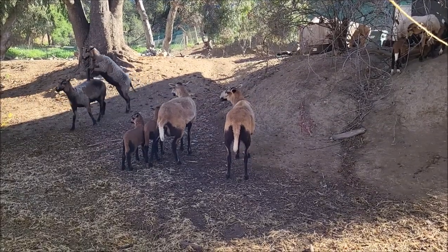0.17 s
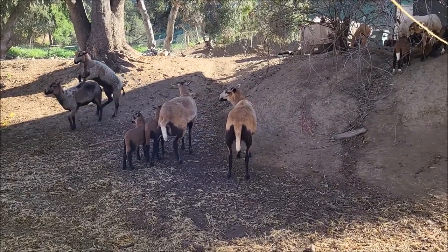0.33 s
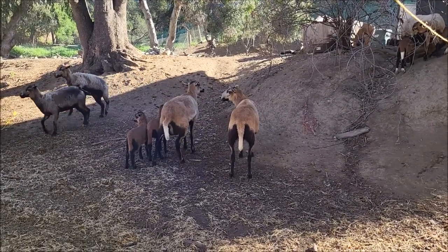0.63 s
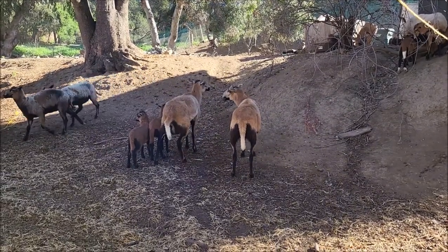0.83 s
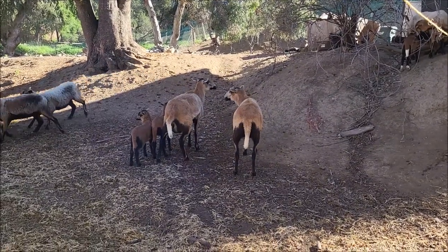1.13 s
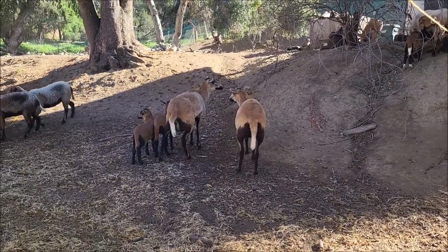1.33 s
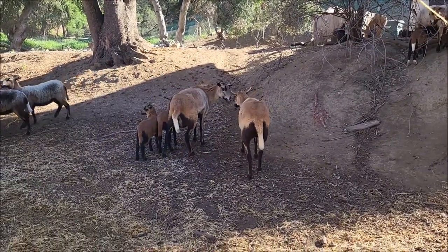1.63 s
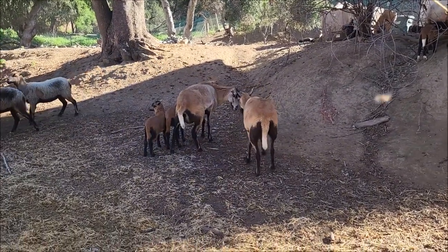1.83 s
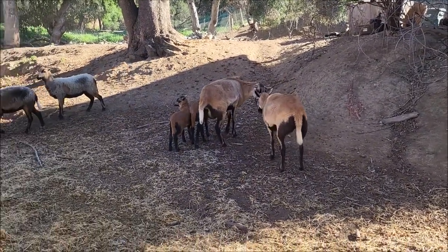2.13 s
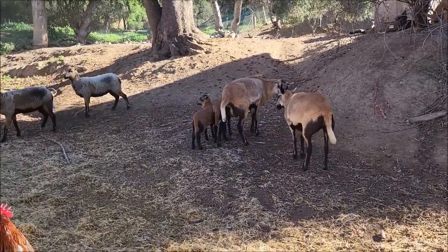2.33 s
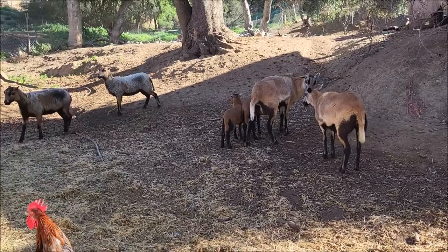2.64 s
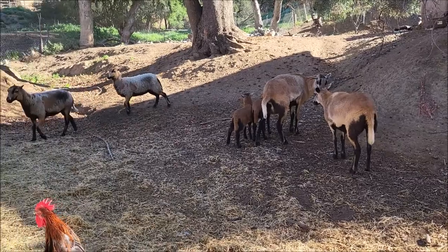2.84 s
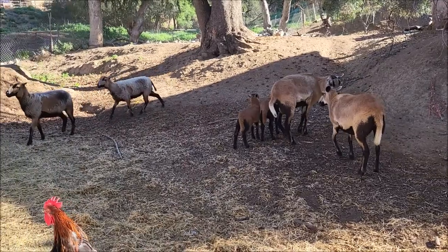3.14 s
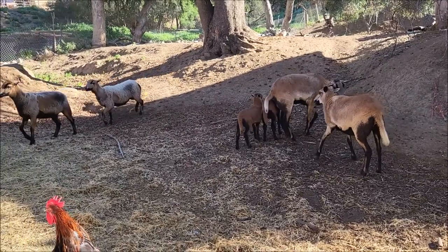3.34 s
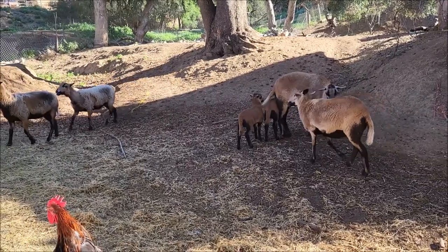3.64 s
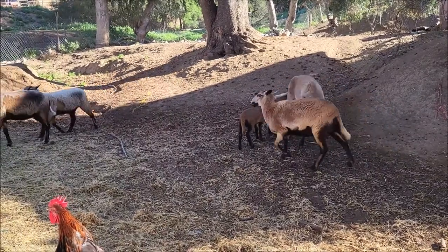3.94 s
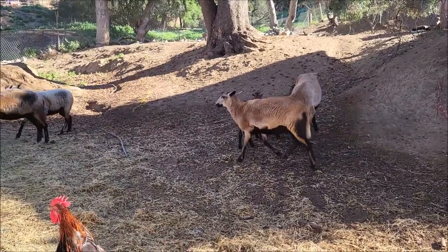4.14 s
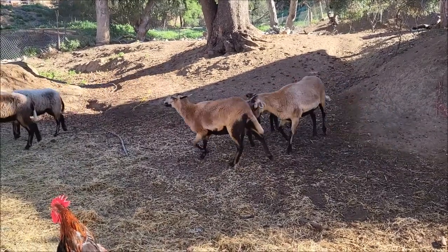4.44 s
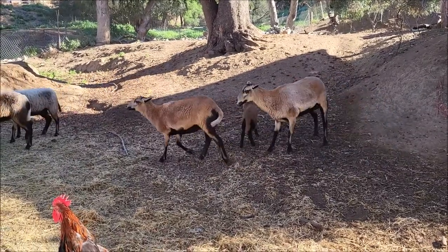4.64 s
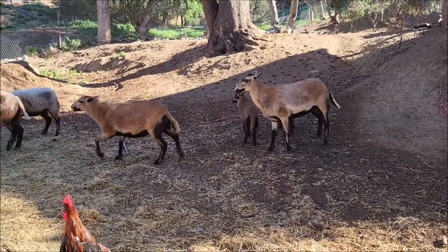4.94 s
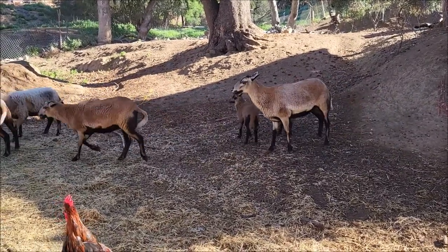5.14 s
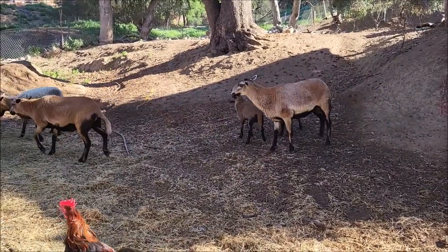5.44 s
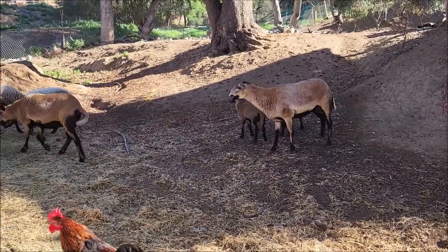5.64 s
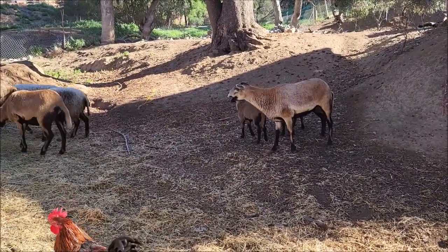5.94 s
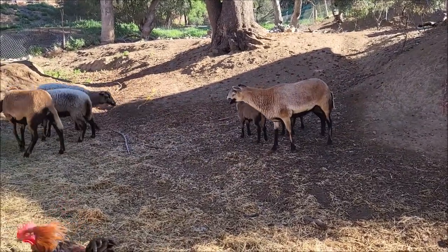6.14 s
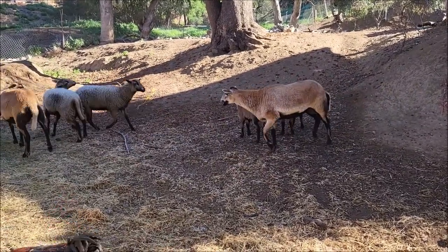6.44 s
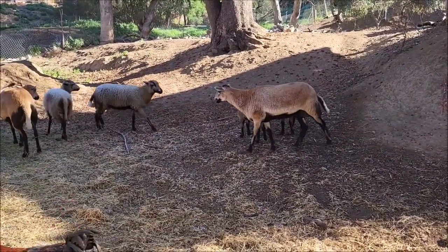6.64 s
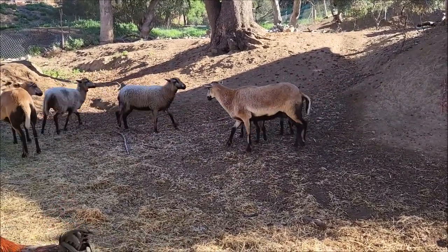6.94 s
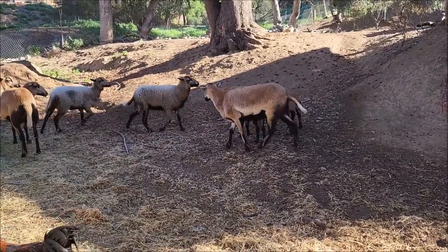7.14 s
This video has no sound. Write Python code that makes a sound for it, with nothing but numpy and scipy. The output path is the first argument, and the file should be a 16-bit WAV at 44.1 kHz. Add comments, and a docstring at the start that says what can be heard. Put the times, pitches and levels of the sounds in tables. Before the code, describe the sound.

An outdoor sheep pen with a quiet, low distant rumble and faint hum throughout. From about 0.1 to 0.55 seconds a sheep across the pen gives a low, creaky, pulsing bleat that swells into a final heave. Straw crackles under hooves, with a step near 0.3 and soft earth thuds around 1.1 to 1.3. At 1.8 and 2.1 a rooster close by makes barely audible clucks. It crows at 2.3: a harsh syllable, a second one with a piercing squawk at 2.6, then from 2.7 a long, clear, nearly steady note, swelling slightly until 4.45. The voice drops abruptly lower, fades, and sinks into a weak groan from 4.7 to 5.5. At 5.6 a close ewe hums briefly with mouth shut, then bleats loudly, nasal and quavering, until 6.5, with a short dull echo off packed earth. Light straw steps and a faint thud around 7 seconds close it.

```python
"""Dirt pen under trees: a creaky far bleat, then a close ewe that hums and gives a quavering call.
Between them a rooster a step away clucks and crows: two harsh syllables, a long clean note, a drop, a groan.
Voices are glottal pulses through throat resonances; the long note is a sum of gliding partials.
Hooves are random clicks in dry straw and damped sine thuds; the earth bank gives a short noise-tail echo.
Behind lie a rumble of shaped noise and a low, wavering hum of three sines."""
import sys
import numpy as np
from scipy import signal
from scipy.fft import rfft, irfft, next_fast_len
from scipy.io import wavfile
from scipy.ndimage import uniform_filter1d, map_coordinates

SR = 44100
rng = np.random.default_rng(int(sys.argv[2]) if len(sys.argv) > 2 else 0)


def store_wav(level_fs):
    """Save 16-bit WAV to argv[1]."""
    pcm = np.round(np.clip(np.atleast_2d(level_fs), -1, 1) * 32767)
    wavfile.write(sys.argv[1], SR, pcm.T.astype(np.int16))


N = 321470
T = np.arange(N) / SR

# ewe's throat: slope [hz, level_db], resonances [centre_hz, width_hz, peak_db]
EWE_THROAT = ([(100, -21), (180, -11), (370, -24.5), (560, -13.5), (1150, -16.5), (1500, -9), (2600, -11.5),
              (3200, -17), (3800, -25.5), (5200, -28.5), (6200, -36), (8000, -34), (10500, -52),
              (13000, -56)], [(687, 190, 16.8), (1613, 290, 12.6), (1822, 43, 4.5), (2123, 115, 9.5),
              (2466, 98, 10.2)])
# ewe's throat, mouth shut: slope [hz, level_db], resonances [centre_hz, width_hz, peak_db]
HUM_THROAT = ([(90, -20), (190, 6.5), (400, -8.5), (600, -18), (900, -15), (1400, -25), (3000, -32.5),
              (8000, -78)], [(203, 60, 3.9)])
# ewe's stereo position: [hz, left_minus_right_db]
EWE_SIDE = [(200, 3), (700, 3.5), (1150, 1.5), (1500, 13), (1850, -4), (2250, 16.5), (2650, 11.5),
            (3300, -4), (4800, 2.5), (9000, 5.5)]
# throat catches that make the ewe quaver: [middle_s, depth_db]
EWE_CATCHES = [(5.751, 11), (5.821, 12.5), (5.891, 6.5), (6.133, 6.5), (6.203, 9.3), (6.273, 6),
               (6.342, 7.5), (6.404, 8)]

# heaves of the far bleat: [start_s, end_s, pitch_hz, base_level_db, onset_brightness_db]
FAR_HEAVES = [(.115, .475, 96.5, -33, 24), (.458, 0.54, 111.4, -22, 1)]
# far sheep's throat: slope [hz, level_db], resonances [centre_hz, width_hz, peak_db]
FAR_THROAT = ([(90, -1.5), (300, -24), (550, -11), (1100, -17.5), (1600, -13.5), (2500, -16), (3000, -22),
              (5000, -34.5), (7000, -35), (10000, -66), (16000, -79)], [(700.4, 135, 24), (1714, 400, 17),
              (2080, 350, 9), (2403, 250, 12.5)])
# far sheep's stereo position: [hz, left_minus_right_db]
FAR_SIDE = [(200, 1), (700, -3), (1700, -1), (2350, 9), (3800, -5), (6800, 10), (9500, 0), (14000, 9)]
# throat catches of the far bleat: [middle_s, depth_db]
FAR_CATCHES = [(.303, 7), (.341, 12), (.379, 13), (.413, 8), (.452, 6)]

# air pushes that open the crow: [start_s, end_s, top_pitch_hz, level_db, release_s]
CROW_PUSHES = [(2.295, 2.408, 571, -18.5, .066), (2.526, 2.62, 641, -19, 0.058),
               (2.68, 2.74, 603, -31, .06)]
# overblown moments, note breaks into a rasp: [middle_s, half_length_s]
CROW_RASPS = [(2.383, .022), (2.603, .021)]
# ringing peak of the second syllable: [time_s, pitch_hz, level_db]
SQUAWK = [(2.55, 600, -42), (2.565, 620, -25), (2.577, 650, -20), (2.586, 705, -10.5), (2.603, 710, -10.5),
          (2.618, 690, -12), (2.63, 640, -34)]
# held note: [time_s, pitch_hz]
HELD_PITCH = [(2.716, 601.3), (2.792, 604), (2.85, 574), (2.88, 564.6), (3.512, 579.5), (3.972, 579.6),
              (4.248, 566.5), (4.258, 565.3), (4.452, 547.2)]
# partials of the held note: [multiple, level_db, left_minus_right_db]
CROW_PARTIALS = [(1, 1.5, 11), (2, 0, 3.5), (3, -10.5, 8.5), (4, -13, 13), (5, -10.5, 10), (6, -11, -1.5),
                 (7, -37, 4), (8, -36, -7), (9, -34.5, 7), (10, -25.5, 1), (11, -37, -10),
                 (12, -27.5, -9.5), (13, -15.5, -5.5), (14, -31.5, -16), (15, -30.5, 12), (16, -37, -17),
                 (17, -39.5, -18), (18, -30, -8.5), (19, -43, 25), (20, -62, 2), (21, -37, 1),
                 (22, -39, -10), (23, -54, -9), (24, -33, 1), (25, -34, 3), (26, -58, -7), (27, -37, -10)]
# narrow peaks and dips that the gliding partials pass through: [centre_hz, width_hz, peak_db]
CROW_RIPPLE = [(599, 11.5, -9.5), (1125.7, 34.4, -9), (1729, 86, -18.5), (2905, 46, -15.5), (3490, 95, -21),
               (5353, 160, 22), (7520, 56, 11.5)]
# groan: [time_s, pitch_hz]
GROAN_PITCH = [(4.685, 326.5), (4.703, 343), (4.773, 401.4), (4.799, 411.7), (4.843, 389), (4.869, 409),
               (4.939, 363.5), (5.227, 331.3), (5.51, 305)]
# throat catches of the groan: [middle_s, depth_db]
GROAN_CATCHES = [(4.745, 6.2), (4.83, 1.7), (4.895, 4)]
# soft throat sounds: [start_s, end_s, pitch_hz, level_db, roughness, brightness_db]
CLUCKS = [(1.759, 1.838, 333, -48, 0.28, -12), (1.831, 1.872, 320, -45.5, 0.5, 27),
          (2.057, 2.081, 307, -40.5, .3, -19), (4.594, 4.7, 342, -44, 0.67, -3)]
# rooster's throat, opening: slope [hz, level_db], resonances [centre_hz, width_hz, peak_db]
CROW_THROAT = ([(200, -21), (420, -21), (700, 2.5), (1150, -3), (1500, -8), (2500, -16), (3300, -2.5),
               (3700, -38.5), (4500, -29.5), (5500, -27), (8000, -26.5), (9300, -33.5), (12000, -29),
               (15500, -34)], [(3230, 440, 6.9), (5440, 410, 13.7), (7530, 400, 5.2)])
# rooster's throat, drop: slope [hz, level_db], resonances [centre_hz, width_hz, peak_db]
DROP_THROAT = ([(200, -20), (400, -8), (800, 3), (1200, -7.5), (1600, -3), (2000, -24), (3200, -13),
               (3800, -37), (4900, -48), (5500, -23), (7500, -30), (9000, -31.5), (12000, -39),
               (15000, -36)], [(3160, 250, 12), (7560, 280, 18.3)])
# rooster's throat, groan: slope [hz, level_db], resonances [centre_hz, width_hz, peak_db]
GROAN_THROAT = ([(150, -25), (360, -2.5), (700, 6.5), (1150, -8.5), (1600, -18), (2100, -35.5), (3000, -21),
                (4000, -27), (5500, -61), (12000, -47)], [(2083, 180, 21), (7320, 700, 30)])
# rooster's throat, clucks: slope [hz, level_db], resonances [centre_hz, width_hz, peak_db]
CLUCK_THROAT = ([(200, 0.5), (360, -2), (650, -4.5), (1000, -3), (2000, -18.5), (4000, -25.5),
                (10000, -46)], [(600, 53, 14)])
# rooster's stereo position: [hz, left_minus_right_db]
CROW_SIDE = [(400, 0), (850, -3), (1150, 0.5), (1900, 10), (2450, 16.5), (3100, 3.5), (5300, 5),
             (6800, -4.5), (9800, -13.5), (13000, 5.5)]

# hoof steps in straw: [time_s, relative_level_db, left_minus_right_db]
STEPS = [(0.016, -41, 12), (0.297, -24.5, 0), (0.6275, -43, 8), (0.842, -40, 3), (0.9542, -48, 3),
         (1.1143, -40, 9), (1.1472, -34, 8), (1.668, -46, 5), (5.5937, -36, 2), (6.828, -38.5, -1),
         (6.8574, -41.5, -0.5), (7.0147, -40, -3), (7.0357, -36, -1), (7.136, -40.5, 2)]
# hooves landing on earth: [time_s, level_db]
THUDS = [(1.112, -36), (1.146, -38), (1.249, -38), (1.274, -36), (7.03, -38)]
# bouts in which the flock stirs the straw: [middle_s, half_length_s, relative_level_db]
STIRS = [(0.206, 0.7, -51), (1.117, 0.15, -50.5), (1.863, 0.059, -60), (3.9, 1.0, -59.5),
         (6.138, 0.32, -47.5), (7.054, 0.17, -63)]
# straw spectrum: [hz, level_db]
STRAW = [(300, -22), (1500, -2.5), (3500, 2.5), (5500, -3), (8000, 6), (10000, -4), (13000, 7), (16000, -1)]
# outdoor air spectrum: [hz, level_db]
AIR = [(12, -28.5), (20, -23), (63, -1), (93, -7.5), (127, -6.5), (150, -19), (234, -16.5), (277, -23),
       (624, -27.5), (949, -26.5), (1960, -31.5), (2910, -43.5), (7110, -47), (12800, -44.5),
       (16000, -41.5)]
# distant rumble, relative to AIR_DB: [time_s, level_db]
RUMBLE = [(0, 1), (1.8, -4), (2.7, -4), (3.6, -5), (4.5, -1.5), (5.3, -0.5), (7.29, -2)]
# low hum: [tone_hz, relative_level_db]
HUM = [(58.5, -66), (119.5, -53.5), (239, -65.5)]

# roughness (0-1) at full effort; slack folds at the ends of a call add SLACK_ROUGH
EWE_ROUGH, HUM_ROUGH, FAR_ROUGH = .06, .2, .33
CROW_ROUGH, DROP_ROUGH, GROAN_ROUGH, SLACK_ROUGH = .12, .06, .1, .3
CATCH_ROUGH_PER_DB, CATCH_ROUGH_S = .012, .07

# slack syrinx, and how fast it follows a push
REST_HZ, PUSH_ATTACK_S, TENSE_S, RELAX_S = 365, .0052, .023, .026
LEAD_IN_S, LEAD_IN_DB = .022, -23  # murmur around the start of each push

HELD_DB, HELD_RELEASE_S = -29.5, .076
SWELL_DB_PER_S, TREBLE_SWELL_DB_PER_S_PER_OCTAVE = 2, .68
# bright start, dull end
HELD_ONSET_DB_PER_OCTAVE, HELD_ONSET_S, HELD_END_DB_PER_OCTAVE = 3, .093, -3

STRAW_CALM_DB, AIR_DB = -67, -46  # before rustle and balance gains
TOP_HZ = 15900


def near_ewe():
    """Ewe: a short hum with the mouth shut, then one arched, quavering call with a ground bounce."""
    pitch = arch(5.688, 6.485, hz=189.7, scoop=.355, scoop_s=.088, drop=.15, drop_s=.15)
    rows = call(pitch, db=-15, attack_s=.06, release_s=.029, rough=EWE_ROUGH, swell_db_per_s=-8,
                bright_db=-5.5, onset_db=6, onset_s=.2, catches=EWE_CATCHES)
    bleat = voice(rows, EWE_THROAT, EWE_SIDE, lead_ms=.035, jitter=.12, shimmer=.9, air=2.4,
                  catches=EWE_CATCHES, catch_s=.016, sag=.011, stretch=.32)
    pitch = arch(5.626, 5.70, hz=213.1, scoop=.011, scoop_s=.02, drop=.33, drop_s=.035)
    rows = call(pitch, db=-27.5, attack_s=.01, release_s=.07, rough=HUM_ROUGH, bright_db=1)
    hum = voice(rows, HUM_THROAT, EWE_SIDE, lead_ms=.01, jitter=.058, shimmer=.53, air=9.9)
    return ground(bleat, bounce=.18, left_ms=3.115, right_ms=5.9) + hum


def far_sheep():
    """Creaky bleat from across the pen: low, rough pulses swell to a last heave."""
    x = 0
    for start, end, hz, db, onset_db in FAR_HEAVES:
        pitch = arch(start, end, hz, scoop=.08, scoop_s=.1, drop=-.04, drop_s=.046)
        rows = call(pitch, db, attack_s=.022, release_s=.023, rough=FAR_ROUGH, swell_db_per_s=27.5,
                    bright_db=2.5, onset_db=onset_db, onset_s=.042)
        x = x + voice(rows, FAR_THROAT, FAR_SIDE, lead_ms=.11, jitter=.22, shimmer=1, air=2.7,
                      catches=FAR_CATCHES, catch_s=.01, sag=.0034, stretch=.038)
    return ground(x, bounce=.24, left_ms=4.3, right_ms=2.9)


def crow():
    """Rooster: clucks, two harsh syllables, held note, drop to the low register, fading groan."""
    rows = crow_opening(bright_db=-3, slack_dull_db=-10, rasp_bright_db=2.5)
    x = voice(rows, CROW_THROAT, CROW_SIDE, lead_ms=.19, jitter=.24, shimmer=.32, air=.6)
    x += held_note(lead_ms=.19, air_db=-55)
    x += squawk(lead_ms=.2, waver=.0112)
    return x + crow_drop() + groan() + clucks()


def crow_opening(bright_db, slack_dull_db, rasp_bright_db):
    """Each air push lifts level, then pitch; overblown, the syrinx falls to rest pitch and rasps."""
    first_start, last_end, last_release = CROW_PUSHES[0][0], CROW_PUSHES[-1][1], CROW_PUSHES[-1][-1]
    t = T[(T > first_start - 2 * LEAD_IN_S) & (T < last_end + 2 * last_release)]
    hz, gain, flow, tension = REST_HZ, 1e-4, 0, 0
    for start, end, top_hz, db, release_s in CROW_PUSHES:
        age, past = np.maximum(t - start, 0), np.maximum(t - end, 0)
        push = (1 - bell(age, 0, PUSH_ATTACK_S)) * bell(past, 0, release_s)
        murmur = amp(LEAD_IN_DB) * bell(t, start, LEAD_IN_S)
        tense = (1 - bell(age, 0, TENSE_S)) * np.exp(-past / RELAX_S)
        hz = hz + (top_hz - REST_HZ) * tense
        gain = gain + amp(db) * (push + murmur)
        flow = flow + push
        tension = tension + tense
    rasp = sum(np.exp(-((t - s) / half) ** 6) for s, half in CROW_RASPS)
    rough = np.clip(CROW_ROUGH + SLACK_ROUGH * (1 - tension) + rasp, 0, 1)
    slack = 1 - np.minimum((flow + tension) / 2, 1)
    bright = bright_db + slack_dull_db * slack + rasp_bright_db * rasp
    return np.column_stack([t, hz + rasp * (REST_HZ - hz), 20 * np.log10(gain), rough, bright])


def squawk(lead_ms, waver):
    """The syrinx briefly locks onto the throat resonance: one nearly pure, wavering sine."""
    t, hz, db = read(SQUAWK)
    phase = 2 * np.pi * np.cumsum(hz * (1 + waver * wander(t, 300))) / SR
    x = unit(np.sin(phase)) * amp(db)
    return place(t, x, x, lead_ms)


def held_note(lead_ms, air_db):
    """Long note: partials on a fluttering pitch swell and glide through narrow peaks and dips."""
    t, hz = read(HELD_PITCH)
    flutter = .0012 * wander(t, 200) + .0015 * wander(t, 30)
    phase = 2 * np.pi * np.cumsum(hz * (1 + flutter)) / SR
    swell = wander(t, 22)
    release = np.exp((t - t[-1]) / HELD_RELEASE_S)
    tilt_db = HELD_ONSET_DB_PER_OCTAVE * np.exp((t[0] - t) / HELD_ONSET_S)
    tilt_db = tilt_db + HELD_END_DB_PER_OCTAVE * release
    x = 0
    for k, (_, db, pan_db) in enumerate(CROW_PARTIALS, 1):
        ripple_db = sum(peak / (1 + (2 * (k * hz - centre) / width) ** 2)
                        for centre, width, peak in CROW_RIPPLE)
        treble_db = TREBLE_SWELL_DB_PER_S_PER_OCTAVE * (t - t.mean()) + tilt_db
        effort_db = SWELL_DB_PER_S * (t - t[0]) + np.log2(k) * treble_db
        flicker_db = np.log(k) * (.6 * swell + .4 * wander(t, 14))
        partial = np.sin(k * phase + k * k) * amp(db + ripple_db + effort_db + flicker_db)
        x = x + np.outer(amp([pan_db / 2, -pan_db / 2]), partial)
    x = x * np.sqrt(2) * amp(HELD_DB) * (1 - .5 * release)
    x = x + amp(air_db) * unit(colour(rng.standard_normal(len(t)), *CROW_THROAT))
    left, right = x * signal.windows.tukey(len(t), .015)
    return place(t, left, right, lead_ms)


def crow_drop():
    """Drop to the low register: a short pulse voice that starts high, sinks and fades."""
    pitch = arch(4.443, 4.61, hz=385, scoop=-.16, scoop_s=.019, drop=.14, drop_s=.026)
    rows = call(pitch, db=-14, attack_s=.03, release_s=.029, rough=DROP_ROUGH, swell_db_per_s=-45,
                bright_db=-3, onset_db=6.5, onset_s=.047)
    return voice(rows, DROP_THROAT, CROW_SIDE, lead_ms=.18, jitter=.15, shimmer=.7, air=.35)


def groan():
    """Fading groan: pulses on an uneven pitch that finally sinks, dented by throat catches."""
    rows = call(GROAN_PITCH, db=-33, attack_s=.012, release_s=.025, rough=GROAN_ROUGH,
                swell_db_per_s=-18.5, bright_db=-6, onset_db=9.5, onset_s=.57, catches=GROAN_CATCHES)
    return voice(rows, GROAN_THROAT, CROW_SIDE, lead_ms=.19, jitter=.15, shimmer=.91, air=.5,
                 catches=GROAN_CATCHES, catch_s=.012, sag=.002)


def clucks():
    """Soft throat sounds: very short pulse calls that fall in pitch."""
    x = 0
    for start, end, hz, db, rough, bright_db in CLUCKS:
        pitch = arch(start, end, hz, scoop=-.13, scoop_s=.018, drop=.08, drop_s=.018)
        rows = call(pitch, db, attack_s=.011, release_s=.011, rough=rough, bright_db=bright_db)
        x = x + voice(rows, CLUCK_THROAT, CROW_SIDE, lead_ms=.18, jitter=.17, shimmer=.96, air=1)
    return x


def arch(start, end, hz, scoop, scoop_s, drop, drop_s):
    """Pitch scoops up by a share as folds tense, drops by a share as air runs out; negatives invert."""
    t = np.linspace(start, end, 200)
    rise = scoop * np.exp((start - t) / scoop_s)
    fall = drop * np.exp((t - end) / drop_s)
    return np.column_stack([t, hz * (1 - rise - fall)])


def call(pitch, db, attack_s, release_s, rough, swell_db_per_s=0, bright_db=0, onset_db=0, onset_s=1,
         catches=()):
    """Effort rises, holds, lets go; slack and catches roughen. Rows: s, Hz, dB, roughness, bright dB."""
    t, hz = read(pitch)
    age = t - t[0]
    effort = (1 - np.exp(-age / attack_s)) * (1 - np.exp((t - t[-1]) / release_s))
    level_db = db + swell_db_per_s * age + 20 * np.log10(effort + 1e-3)
    catch_rough = sum(CATCH_ROUGH_PER_DB * depth * bell(t, s, CATCH_ROUGH_S) for s, depth in catches)
    rough = rough + SLACK_ROUGH * (1 - effort) + catch_rough
    return np.column_stack([t, hz, level_db, rough, bright_db + onset_db * np.exp(-age / onset_s)])


def voice(rows, throat, side, lead_ms, jitter, shimmer, air, catches=(), catch_s=.015, sag=.01, stretch=0):
    """One call: pulses ring the throat; each catch drops level and pitch (sag: share per dB) together."""
    t, hz, db, rough, bright_db = read(rows)
    dip_db = sum(depth * bell(t, s, catch_s) for s, depth in catches)
    hz = hz * (1 - sag * dip_db)
    # throat tightens as pitch climbs: its resonances run on a faster clock
    tight = (hz / np.median(hz)) ** stretch
    clock = np.cumsum(tight)
    ticks = np.arange(clock[-1] + 1)
    tick_hz, tick_rough = np.interp(ticks, clock, hz / tight), np.interp(ticks, clock, rough)
    source = folds(ticks / SR, tick_hz, tick_rough, jitter, shimmer, air)
    x = map_coordinates(colour(smear(source), *throat), [clock], order=3)
    # brightness scales what lies above 1300 Hz
    low = signal.sosfiltfilt(signal.butter(3, 1300, fs=SR, output="sos"), x)
    x = low + amp(bright_db) * (x - low)
    # flatten the running level, then impose the call's own
    power = uniform_filter1d(uniform_filter1d(x ** 2, size=700), size=700)
    x = x / np.sqrt(np.abs(power) + 1e-12) * amp(db - dip_db)
    left, right = (colour(x, [(f, sign * d / 2) for f, d in side]) for sign in (1, -1))
    return place(t, left, right, lead_ms)


def folds(t, hz, rough, jitter, shimmer, air):
    """Glottal pulses; roughness unsettles their timing and size and adds a puff of hiss to each."""
    unsteady = np.exp(jitter * np.abs(rough) ** 1.4 * wander(t, np.mean(hz)))
    phase = np.cumsum(hz * unsteady) / SR
    offset = (phase + .5) % 1 - .5
    lag = offset * SR / hz  # samples from the pulse centre
    pulses = np.sinc(lag * 4 / 5) * np.exp(-(lag / 8) ** 2)
    pulses = unit(pulses - uniform_filter1d(pulses, size=1024))
    hiss = colour(rng.standard_normal(len(t)), [(500, -22), (2500, -14), (5000, 0)])
    puffs = unit(np.exp(-4 * (phase % 1)) * hiss)
    size = np.exp(shimmer * rough * wander(t, np.mean(hz) / 2))
    return (pulses + air * np.sqrt(np.abs(rough)) * puffs) * size


def smear(x):
    """Short round trips in the mouth (allpass) spread each pulse in time without colouring it."""
    for lag in (13, 29, 47):  # samples
        loop = np.r_[1, np.zeros(lag - 1), -.6]
        x = signal.lfilter(loop[::-1], loop, x)
    return x


def ground(x, bounce, left_ms, right_ms):
    """Bounce off packed earth: a weaker copy reaches each microphone just after the direct sound."""
    late = [np.interp(T - ms / 1000, T, c) for c, ms in zip(x, (left_ms, right_ms))]
    return x + bounce * np.array(late)


def hooves(step_db, step_s, rustle_db, grain_db, thud_hz, thud_s):
    """Straw snaps in tiny random clicks, thickly under each step; heavy steps thump the earth."""
    stirred = amp(STRAW_CALM_DB) + sum(amp(db) * bell(T, s, half) for s, half, db in STIRS)
    envelope = np.ones((2, 1)) * stirred * amp(rustle_db + 2.5 * wander(T, 45))
    for s, db, pan_db in STEPS:
        near = (T >= s) & (T < s + .1)
        burst = amp(db + step_db) * np.exp((s - T[near]) / step_s)
        envelope[:, near] += np.outer(amp([pan_db / 2, -pan_db / 2]), burst)
    sizes = amp(grain_db * np.minimum(rng.exponential(size=N), 6))
    clicks = [rng.standard_normal(N) * sizes * (rng.random(N) < .15) for _ in range(2)]
    out = envelope * [unit(colour(c, STRAW)) for c in clicks]
    for s, db in THUDS:
        near = (T >= s) & (T < s + .1)
        age = T[near] - s
        out[:, near] += amp(db) * np.sin(2 * np.pi * thud_hz * age) * np.exp(-age / thud_s)
    return out


def bank(x, wet_db, t60_s):
    """Earth bank and trees: scattered, dull echoes as decaying noise tails, one per microphone."""
    t = T[:SR // 2]
    dull = [(200, -10.5), (700, 2.5), (2200, 4.5), (5000, 2.5), (14000, -44)]
    decay = amp(-60 * t / t60_s) * (t > .006)
    tails = [colour(rng.standard_normal(len(t)) * decay, dull) for _ in range(2)]
    mono = x[0] + x[1]
    echoes = [signal.oaconvolve(mono, h / np.linalg.norm(h))[:N] / 2 for h in tails]
    return amp(wet_db) * np.array(echoes)


def outdoors(side_db, hum_db):
    """Distant rumble alike in both microphones, a wider noise wash above it, wavering hum sines."""
    mid, side = (unit(colour(rng.standard_normal(N), AIR)) for _ in range(2))
    side = amp(side_db) * colour(side, [(150, -19.5), (350, -9), (800, -1.5), (2000, -1.5)])
    hum = 0
    for hz, db in HUM:
        tone = unit(np.sin(2 * np.pi * hz * T + .5 * wander(T, 4.6)))
        hum = hum + amp(db + 2.65 * wander(T, 11)) * tone
    level = amp(AIR_DB + np.interp(T, *np.transpose(RUMBLE)))
    x = level * (mid + np.outer([1, -1], side)) + amp(hum_db) * hum
    return x * amp([[.6], [-.6]])  # left, right balance in dB


def amp(db):
    """Decibels to gain."""
    return 10 ** (np.asarray(db) / 20)


def unit(x):
    """Scale to rms 1."""
    return x / np.sqrt(np.mean(x ** 2) + 1e-18)


def bell(t, middle, half):
    """Smooth bump of height 1."""
    return np.exp(-((t - middle) / half) ** 2)


def read(rows):
    """Sample times that a curve spans, and its columns at those times."""
    s, *columns = np.transpose(rows)
    t = T[(T >= s[0]) & (T <= s[-1])]
    return t, *(np.interp(t, s, c) for c in columns)


def wander(t, hz):
    """Random curve of rms 1 through hz new values a second."""
    knots = np.arange(t[0], t[-1] + 2 / hz, 1 / hz)
    return unit(np.interp(t, knots, rng.standard_normal(len(knots))))


def response(points, resonances=(), size=2048):
    """Causal (minimum-phase) impulse response of a slope with resonances on top."""
    f = np.arange(size // 2 + 1) * SR / size
    hz, db = np.transpose(points)
    db = np.interp(np.log(f + 1), np.log(hz), db)
    for centre, width, peak in resonances:
        db = db + peak / (1 + (2 * (f - centre) / width) ** 2)
    # fold the cepstrum onto positive time
    cepstrum = irfft(np.log(amp(db)))
    cepstrum[1:size // 2] *= 2
    cepstrum[size // 2 + 1:] = 0
    return irfft(np.exp(rfft(cepstrum)))


def colour(x, points, resonances=()):
    """Pass a sound through such a response."""
    return signal.oaconvolve(x, response(points, resonances))[:len(x)]


def place(t, left, right, lead_ms):
    """Lay a sound into the scene; it reaches the left microphone lead_ms earlier."""
    out, start = np.zeros((2, N)), int(round(t[0] * SR))
    size = next_fast_len(len(t) + 256)
    f = np.arange(size // 2 + 1) * SR / size
    delay = np.exp(-2j * np.pi * f * lead_ms / 1000)
    out[:, start:start + len(t)] = left, irfft(rfft(right, size) * delay, size)[:len(t)]
    return out


def scene():
    """Sheep, rooster and hooves in the open pen."""
    ewe, far, rooster = near_ewe(), far_sheep(), crow()
    echoes = bank(ewe, wet_db=-15, t60_s=.22) + bank(far, wet_db=-8, t60_s=.16)
    echoes += bank(rooster, wet_db=-22, t60_s=.3)
    steps = hooves(step_db=-5.5, step_s=.005, rustle_db=-2, grain_db=2.6, thud_hz=85, thud_s=.014)
    return ewe + far + rooster + steps + echoes + outdoors(side_db=2, hum_db=-3)


def record(dry):
    """Recorder: rounds the loudest peaks, cuts above TOP_HZ."""
    rounded = dry / (1 + (dry / .8) ** 4) ** .25
    return signal.sosfilt(signal.ellip(10, .2, 70, TOP_HZ, fs=SR, output="sos"), rounded)


dry = scene()
out = record(dry)
store_wav(out)
```